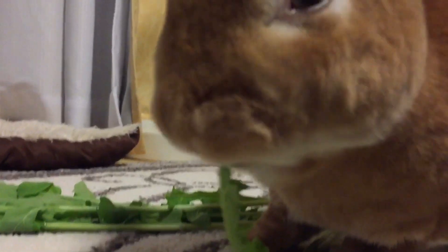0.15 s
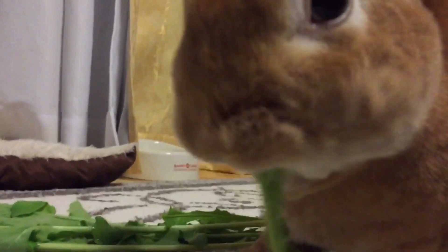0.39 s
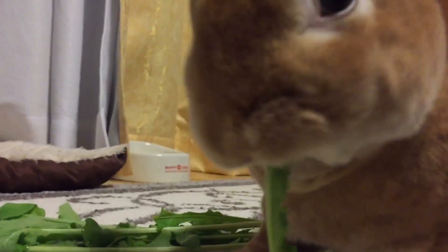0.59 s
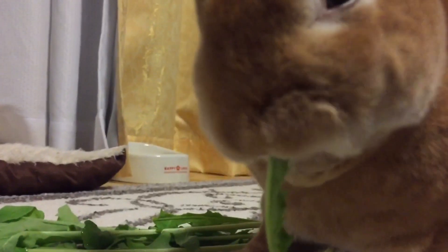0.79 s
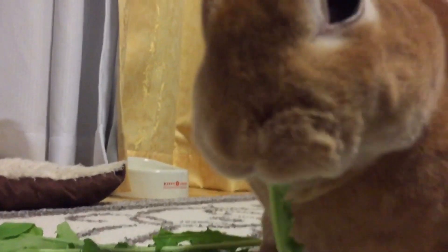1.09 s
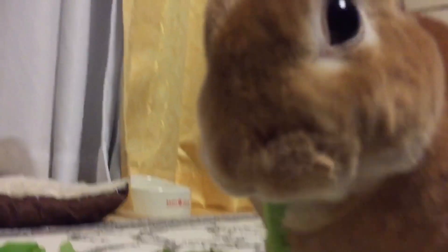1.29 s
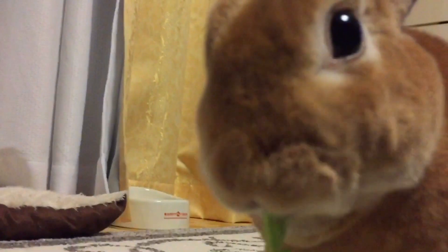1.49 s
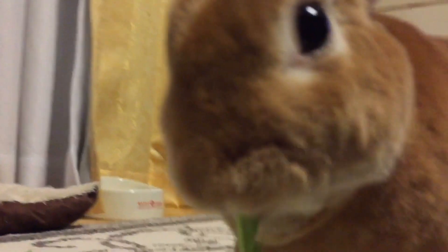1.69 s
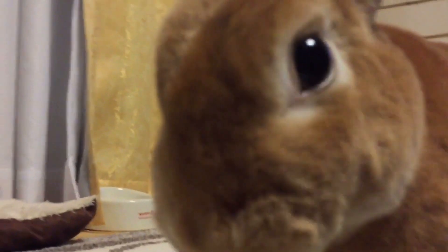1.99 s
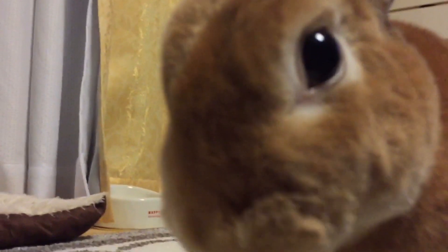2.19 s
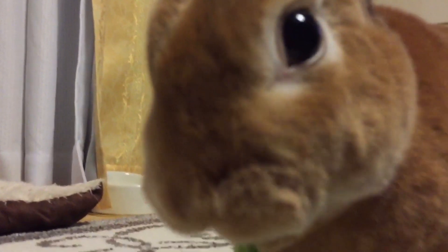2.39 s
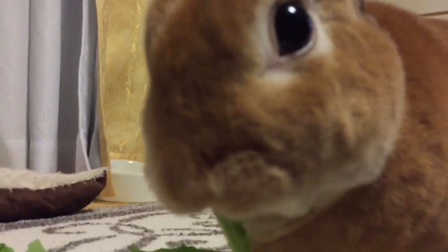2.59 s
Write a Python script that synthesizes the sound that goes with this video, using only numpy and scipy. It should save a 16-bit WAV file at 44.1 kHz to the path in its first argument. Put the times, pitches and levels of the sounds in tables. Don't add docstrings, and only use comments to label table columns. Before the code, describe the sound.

A rabbit crunches a leafy stalk up close, crisp quick bites with two hard knocks

```python
import sys
import numpy as np
from scipy import signal
from scipy.fft import rfft, irfft, next_fast_len
from scipy.io import wavfile
from scipy.ndimage import map_coordinates

SR = 44100
rng = np.random.default_rng(int(sys.argv[2]) if len(sys.argv) > 2 else 0)


def elevation(decibels):
    levels = np.asarray(decibels, float)
    return 10 ** (levels / 20)


def master_out(mix):
    frames = np.transpose(np.atleast_2d(mix))
    ceiling = np.clip(frames, -1, 1)
    pcm = np.round(ceiling * 32767).astype(np.int16)
    wavfile.write(sys.argv[1], SR, pcm)


N = 119070
TOP_HZ = 15780


def unit(x):
    return x / np.sqrt(np.mean(x ** 2) + 1e-20)


def along(points, hz):
    f, db = np.transpose(points)
    return elevation(np.interp(np.log(hz + 1), np.log(f + 1), db, left=-120))


def wobble(rate_hz):
    knots = rng.standard_normal(int(N * rate_hz / SR) + 4)
    return map_coordinates(knots, [np.arange(N) * rate_hz / SR])


def filtered(x, response):
    m = next_fast_len(x.shape[-1] + 8192)
    spectrum = rfft(x, m) * response(np.fft.rfftfreq(m, 1 / SR))
    return irfft(spectrum, m)[..., :x.shape[-1]]


def ring(f, hz, width_hz):
    return 1j * f * width_hz / (hz * hz - f * f + 1j * f * width_hz)


def noise(spectrum):
    return unit(filtered(rng.standard_normal(N), lambda f: along(spectrum, f)))


def swell(start_s, length_s, rise_s, fall_s):
    t = np.arange(N) / SR - start_s
    ramp = np.minimum(t / rise_s, (length_s - t) / fall_s)
    return np.sin(np.pi / 2 * np.clip(ramp, 0, 1)) ** 2


# pitch_hz, level_db (rms)
HUM_LINES = [
    (60, -69),
    (119.5, -56.5),
    (179, -60.5),
    (240, -69),
]


def hum():
    t = np.arange(N) / SR
    out = np.zeros(N)
    for pitch_hz, level_db in HUM_LINES:
        level = np.sqrt(2) * elevation(level_db + 4 * wobble(26))
        out += level * np.sin(2 * np.pi * pitch_hz * t + 0.19 * wobble(10.1))
    return out


# time_s, level_db
STIR_LEVEL = [(0.0, -75), (.3, -56), (.45, -53.5), (.65, -52), (.75, -57), (.85, -52), (1.0, -68),
              (1.12, -50), (1.38, -50.5), (1.55, -59), (1.8, -49.5), (2.0, -57), (2.2, -60), (2.7, -62)]
# pitch_hz, level_db
FUR_COLOUR = [(300, -0.5), (700, 2.5), (1700, -0.5), (2400, -2), (3600, -7), (6000, -17), (14000, -19)]


def stirring():
    level_db = np.interp(np.arange(N) / SR, *np.transpose(STIR_LEVEL))
    return elevation(-6 + level_db + 0.91 * wobble(37.8)) * noise(FUR_COLOUR)


# pitch_hz, level_db
RUMBLE_COLOUR = [(12, -34), (20, -37), (53, 2.5), (90, -1.5), (124, -0.5), (147, 2.5), (182, 1),
                 (600, -29.5), (780, -73), (1320, -120)]


def rumble():
    colour = list(RUMBLE_COLOUR) + [(900, -73)]
    return elevation(-54.5 + 3.4 * wobble(10)) * noise(colour)


# pitch_hz, level_db
HISS_COLOUR = [(180, 5), (300, -0.5), (1330, -7.5), (1600, -10), (2050, -6.5), (2580, -9), (4240, -10),
               (4930, -12), (9000, -13), (15700, -17.5)]


def hiss():
    return elevation(-57 + wobble(6.23) / 2) * noise(HISS_COLOUR)


# start_s, level_db (peak), pitch_hz, length_s
THUMPS = [(.215, -36.5, 92.5, 0.02), (0.759, -40, 75, 0.023), (1.102, -29.5, 137, 0.011),
          (1.246, -31.5, 165, 0.01), (1.35, -40.5, 136, 0.016), (1.588, -38.5, 177, 0.02),
          (2.431, -50, 50.6, 0.045), (0.704, -50, 698, 0.019), (0.915, -43.5, 536, 0.0093),
          (1.856, -43, 398, 0.013), (2.074, -38.5, 131, 0.024), (2.578, -42.5, 483, 0.011),
          (0.898, -47, 928, 0.011), (0.915, -41, 2080, 0.0039), (0.945, -44.5, 1166, 0.0061),
          (1.288, -50, 658, 0.013), (2.069, -43, 917, 0.0084), (2.288, -38, 1636, 0.0077)]


def thumps():
    out = np.zeros(N)
    for start_s, level_db, pitch_hz, length_s in THUMPS:
        t = np.clip(np.arange(N) / SR - start_s, 0, None)
        cycles = pitch_hz * t * (1.1 - 0.1 * t / length_s)
        shape = swell(start_s, 1.49 * length_s, .5 * length_s, length_s)
        out += elevation(level_db) * shape * np.sin(2 * np.pi * cycles)
    return out


# start_s, level_db, bass_db, treble_tilt_db_per_khz
KNOCKS = [
    (.6196, -9.5, 0, -.3),
    (1.4477, -11, 6, -1.3),
]
# pitch_hz, level_db
KNOCK_COLOUR = [(25, -30), (50, -9), (110, 1), (400, -9), (620, -7), (1200, -4), (2000, -3), (2800, -9),
                (4200, -14), (6000, -18), (11000, -45)]
# pitch_hz, width_hz, depth (share)
DEAD_SPOTS = [
    [(1550, 450, .92), (2350, 500, .4), (3500, 700, .4), (4580, 500, .93), (5150, 500, .95),
     (6950, 700, .9), (7850, 600, .85)],
    [(1500, 550, .92), (2600, 400, .7), (3500, 600, .93), (4450, 400, .7), (5200, 400, .75),
     (5950, 400, .8), (6650, 500, .9), (7580, 500, .95)],
]


def knocks():
    suspension_hz, bass_hz = 72, 600
    travel_s = .06
    click = np.zeros(N)
    click[0] = 1
    out = np.zeros(N)
    for (start_s, level_db, bass_db, tilt_db), spots in zip(KNOCKS, DEAD_SPOTS):

        def floor(f):
            cancelled = np.prod([1 - depth * ring(f, hz, width_hz) for hz, width_hz, depth in spots], 0)
            return cancelled * (1 + ring(f, 615, 130))

        def arrival(f):
            spring = (ring(f, suspension_hz, suspension_hz) * 1j * f / suspension_hz) ** 2
            delay = 2 * np.pi * (f * start_s + 2 * travel_s * np.sqrt(f))
            return np.exp(1j * np.angle(spring) - 1j * delay)

        def path(f):
            tone_db = bass_db / (1 + (f / bass_hz) ** 4) + tilt_db * f / 1000
            return along(KNOCK_COLOUR, f) * elevation(tone_db) * floor(f) * arrival(f)

        blow = filtered(click, path)
        out -= elevation(level_db) * blow / np.abs(blow).max()
    return out


# start_s, length_s, level_db, ringing_db
RUBS = [
    (1.39, .15, -48.5, -20),
    (1.615, .155, -49.5, 2.5),
]
# pitch_hz, width_hz, level_db
CASE_RINGS = [
    (1604, 72, 4.5),
    (1830, 92, 4),
]


def rubs():
    def case(f):
        return sum(elevation(level_db) * ring(f, hz, width_hz) for hz, width_hz, level_db in CASE_RINGS)

    rough = noise(FUR_COLOUR) * elevation(2.5 * wobble(120))
    rings = unit(filtered(rough, case))
    out = np.zeros(N)
    for start_s, length_s, level_db, ringing_db in RUBS:
        stroke = swell(start_s, length_s, .3 * length_s, .4 * length_s)
        out += elevation(level_db) * stroke * (rough + elevation(ringing_db) * rings)
    return out


TOOTH_HZ, TOOTH_WIDTH_HZ = 6320, 2800
LEAF_HZ, LEAF_WIDTH_HZ = 13300, 4200
JAW_HZ, JAW_WIDTH_HZ = 1400, 1200
BREAK_S = .0002
PEAK_S = 1.5 * BREAK_S


def bursts(times, gains, tooth_hz, size=256):
    scatter = .1
    t, f = np.arange(size) / SR / BREAK_S, np.fft.rfftfreq(size, 1 / SR)
    draw = rng.standard_normal((len(times), size + 3))
    spark = rfft(draw[:, 3:] * np.exp(-2 * (t - 1.5) ** 2))
    spark = spark / (np.abs(spark) + 1e-9) ** .7
    leaf_hz = np.minimum(LEAF_HZ * np.exp(scatter ** 2 * draw[:, :1]), TOP_HZ)
    jaw_hz = JAW_HZ * np.exp(scatter * draw[:, 1:2])
    bands = [(tooth_hz[:, None], TOOTH_WIDTH_HZ), (leaf_hz, LEAF_WIDTH_HZ), (jaw_hz, JAW_WIDTH_HZ)]
    rows = 0
    for k, (hz, width_hz) in enumerate(bands):
        part = irfft(spark * ring(f, hz, width_hz) ** 2, size)
        rows = rows + gains[:, k:k + 1] * part / np.abs(part).max(1, keepdims=True)
    at = np.round(times * SR).astype(int)[:, None] + np.arange(size)
    return np.bincount(at.ravel(), rows.ravel(), N + SR)[:N]


# time_s (of the peak), level_db (peak), pitch_hz
TICKS = [(0.2545, -41.0, 12700.0), (0.3389, -32.0, 14300.0), (0.3498, -28.0, 12700.0),
         (0.4199, -43.0, 4800.0), (0.4512, -40.0, 12400.0), (0.4669, -41.0, 13300.0),
         (0.5168, -34.0, 5700.0), (0.5211, -31.0, 10700.0), (0.5662, -36.0, 14700.0),
         (0.5775, -37.0, 14000.0), (0.7175, -31.0, 12100.0), (0.7263, -25.0, 10300.0),
         (0.7409, -32.0, 14600.0), (0.9089, -29.0, 7000.0), (0.9106, -25.0, 5900.0),
         (0.9125, -24.0, 6500.0), (0.9408, -27.0, 13900.0), (0.9429, -27.0, 7500.0),
         (0.948, -26.0, 14100.0), (0.9562, -31.0, 13600.0), (1.0856, -37.0, 7100.0),
         (1.1182, -35.0, 6100.0), (1.1731, -33.0, 14000.0), (1.2537, -35.0, 9200.0),
         (1.2616, -35.0, 10600.0), (1.2649, -38.0, 6300.0), (1.2785, -34.0, 7400.0),
         (1.2935, -39.0, 8600.0), (1.5718, -42.0, 5500.0), (1.5892, -38.0, 11900.0),
         (1.6884, -37.0, 12300.0), (1.7216, -36.0, 5100.0), (1.8047, -42.0, 6300.0),
         (1.8464, -38.0, 6300.0), (1.8687, -29.0, 13000.0), (1.883, -31.0, 13000.0), (2.002, -39.0, 9700.0),
         (2.0481, -24.0, 10200.0), (2.0578, -27.0, 14500.0), (2.0617, -28.0, 14600.0),
         (2.2436, -36.0, 14300.0), (2.298, -30.0, 6200.0), (2.2993, -31.0, 6400.0),
         (2.4666, -38.0, 14600.0), (2.5512, -38.0, 12100.0), (2.5577, -35.0, 11700.0),
         (2.5722, -36.0, 10600.0), (2.5736, -36.0, 11200.0), (2.5791, -33.0, 9800.0),
         (2.5987, -41.0, 10600.0)]


def ticks():
    time_s, level_db, pitch_hz = np.transpose(TICKS)
    shares = [1, elevation(-8), 0]
    return bursts(time_s - PEAK_S, elevation(level_db - 2)[:, None] * shares, pitch_hz)


# start_s, length_s, level_db, leaf_db (brightness), jaw_db (body)
CHEWS = [(-.01, 0.029, -57, 6.5, -3), (0.333, 0.072, -55.5, 9, 1), (0.509, 0.026, -51, 7, -26),
         (0.536, 0.027, -53, 13.5, -5), (0.557, 0.038, -60, 5, 4), (0.713, 0.043, -50.5, 12.5, -5.5),
         (0.899, 0.046, -48, 3, -9), (0.936, 0.045, -49.5, 7, -6), (1.12, 0.054, -52.5, 9.5, -1),
         (1.243, 0.05, -57.5, 0, -3), (1.855, 0.065, -52, 3.5, -12), (2.038, 0.065, -46.5, 7, -7),
         (2.226, 0.05, -62.5, 6, -27), (2.263, 0.053, -50.5, 5.5, -2.5), (2.41, 0.056, -50.5, 7, -2),
         (2.564, 0.044, -63.5, 10.5, 0)]


def jaw_strokes(band):
    lead_s = 0.03
    out = np.zeros(N)
    for start_s, length_s, level_db, leaf_db, jaw_db in CHEWS:
        bite = swell(start_s, length_s, .012, .6 * length_s)
        around = swell(start_s - lead_s, length_s + 2 * lead_s, lead_s, 2 * lead_s)
        out += elevation(level_db + [0, leaf_db, jaw_db][band]) * (bite + 0.12 * around)
    return out


def crunch():
    per_s, spread_db = 1400, 2.3
    draw = rng.random((int(per_s * N / SR), 6))
    times = (np.arange(len(draw)) + 4 * draw[:, 0]) / per_s
    size = elevation(-spread_db * np.log(draw[:, 1:2] + 1 / 50) + 8 * draw[:, 2:5])
    tooth_hz = TOOTH_HZ * (0.74 + 0.57 * draw[:, 5])
    clumps_db = 2.5 * wobble(70)
    bands = [(TOOTH_HZ, TOOTH_WIDTH_HZ), (LEAF_HZ, LEAF_WIDTH_HZ), (JAW_HZ, JAW_WIDTH_HZ)]
    out = np.zeros(N)
    for k, (hz, width_hz) in enumerate(bands):
        crackle = unit(bursts(times, size * (np.arange(3) == k), tooth_hz))
        crush = unit(filtered(rng.standard_normal(N), lambda f: ring(f, hz, 3 * width_hz) ** 2))
        crush = crush * elevation(-6 + 2.5 * wobble(180))
        out += jaw_strokes(k) * elevation(clumps_db + 3.03 * wobble(50)) * (crackle + crush)
    return out


# time_s (of the peak), tooth_db (peak), leaf_db and jaw_db (over tooth), pitch_hz (tooth)
EARLY_SNAPS = [(0.0657, -40.0, -2.0, -16.0, 6600.0), (0.269, -34.0, 5.0, -33.0, 7500.0),
               (0.3652, -22.0, -3.0, -9.0, 6300.0), (0.367, -32.0, -1.0, -7.0, 7800.0),
               (0.3789, -30.0, 3.0, -6.0, 7800.0), (0.3865, -30.0, -2.0, -16.0, 7100.0),
               (0.5192, -25.0, -12.0, -31.0, 6900.0), (0.5224, -33.0, -5.0, -41.0, 8100.0),
               (0.5437, -33.0, 5.0, -37.0, 8200.0), (0.5497, -29.0, 7.0, -18.0, 8100.0),
               (0.5516, -31.0, 6.0, -21.0, 7200.0), (0.6598, -38.0, 1.0, -20.0, 7100.0),
               (0.7131, -35.0, -5.0, -36.0, 7200.0), (0.7284, -21.0, -1.0, -28.0, 7200.0),
               (0.7348, -31.0, 8.0, -21.0, 7600.0), (0.7434, -35.0, 7.0, -20.0, 7100.0),
               (0.7582, -41.0, 11.0, -12.0, 7300.0), (0.9156, -15.0, -5.0, -23.0, 6400.0),
               (0.9176, -11.0, -6.0, -30.0, 6700.0), (0.9501, -23.0, 4.0, -15.0, 7600.0),
               (1.13, -21.0, -3.0, -34.0, 6900.0), (1.132, -31.0, 5.0, -40.0, 7100.0)]
LATE_SNAPS = [(1.1454, -25.0, 2.0, -18.0, 6800.0), (1.1525, -32.0, -4.0, -15.0, 6500.0),
              (1.1744, -34.0, -4.0, -24.0, 7000.0), (1.2589, -35.0, 1.0, -17.0, 8500.0),
              (1.4159, -39.0, 16.0, -28.0, 8100.0), (1.6051, -39.0, 18.0, -38.0, 7200.0),
              (1.8555, -35.0, 4.0, -9.0, 6500.0), (1.8971, -36.0, 5.0, -24.0, 6400.0),
              (1.9393, -32.0, -11.0, -26.0, 6600.0), (2.0463, -26.0, -1.0, -41.0, 7200.0),
              (2.0512, -31.0, 6.0, -22.0, 7100.0), (2.0741, -11.0, -4.0, -21.0, 4800.0),
              (2.1016, -38.0, 7.0, -36.0, 6500.0), (2.1037, -36.0, 5.0, -29.0, 7000.0),
              (2.2367, -50.0, 17.0, -28.0, 6900.0), (2.2724, -36.0, 8.0, -36.0, 6400.0),
              (2.2889, -17.0, -12.0, -20.0, 5700.0), (2.3242, -42.0, 4.0, -36.0, 6200.0),
              (2.4285, -25.0, 2.0, -19.0, 7100.0), (2.4415, -21.0, -0.0, -18.0, 6600.0),
              (2.5456, -35.0, 13.0, -42.0, 8200.0), (2.5632, -48.0, 15.0, -18.0, 6700.0)]


def snaps():
    time_s, tooth_db, leaf_db, jaw_db, pitch_hz = np.vstack([EARLY_SNAPS, LATE_SNAPS]).T
    peaks_db = np.array([tooth_db, tooth_db + leaf_db, tooth_db + jaw_db]).T
    return bursts(time_s - PEAK_S, elevation(1 + peaks_db), pitch_hz)


def room(x):
    t = np.arange(SR // 5) / SR
    tail = rng.standard_normal(len(t)) * elevation(-60 * t / .06)
    return elevation(-23) * signal.fftconvolve(x, tail / np.linalg.norm(tail))[:N]


def scene():
    near = snaps() + crunch() + rubs() + ticks()
    borne = knocks() + thumps()
    wet = room(near + borne / 2)
    background = hum() + stirring() + rumble() + hiss()
    return (near + borne + wet + background)[None]


def low_pass(x):
    return signal.sosfilt(signal.butter(12, 16830, fs=SR, output="sos"), x)


def record(dry):
    def colouring(f):
        top = np.where(f < TOP_HZ, 1, elevation(-31) * (f < 16850))
        return top * (1 - .3 * ring(f, 10600, 1100))

    return low_pass(filtered(dry, colouring))


dry = scene()
out = record(dry)
master_out(out)
```